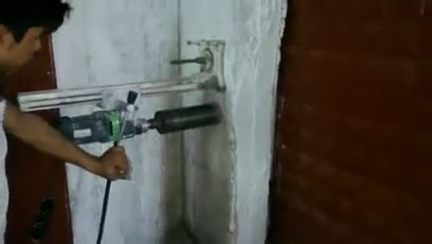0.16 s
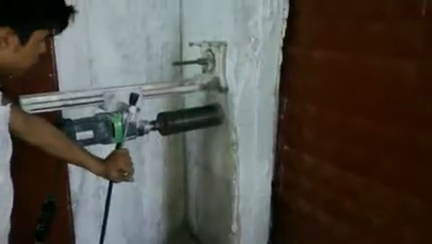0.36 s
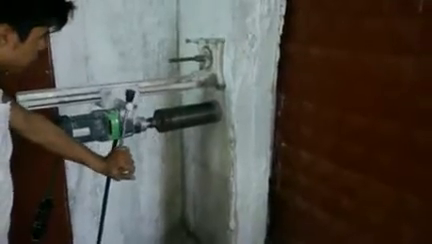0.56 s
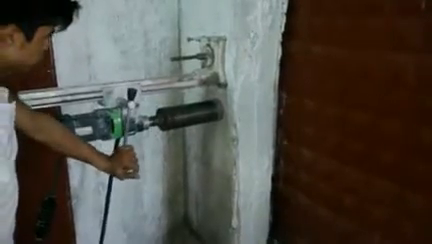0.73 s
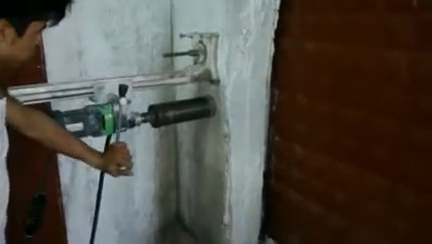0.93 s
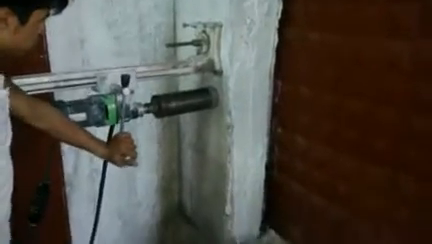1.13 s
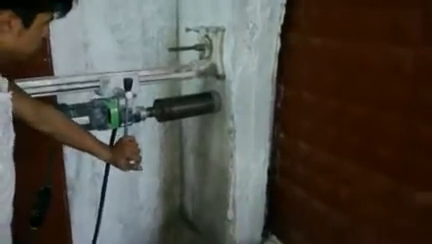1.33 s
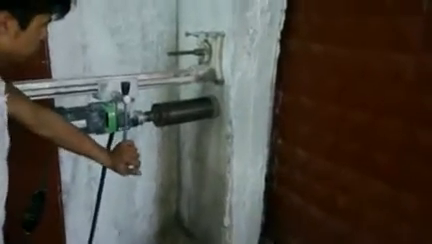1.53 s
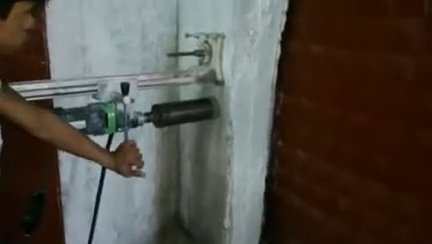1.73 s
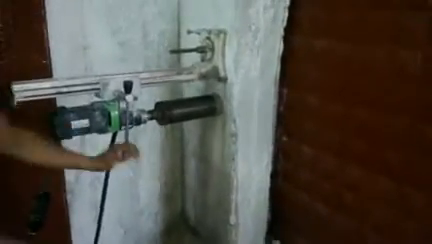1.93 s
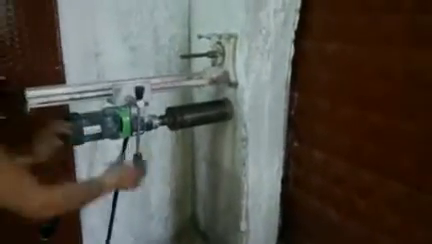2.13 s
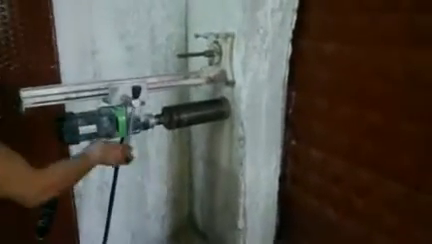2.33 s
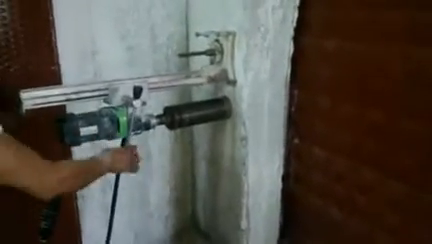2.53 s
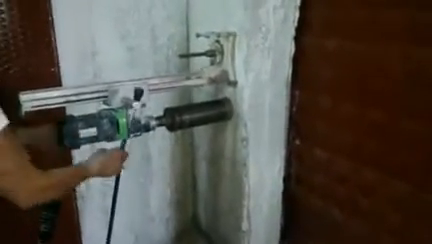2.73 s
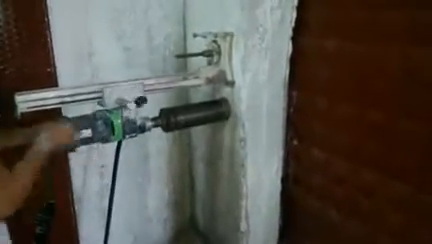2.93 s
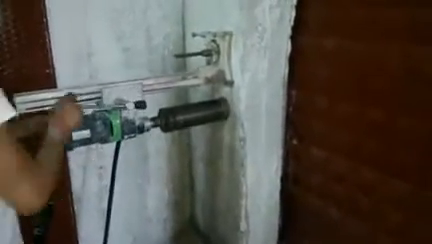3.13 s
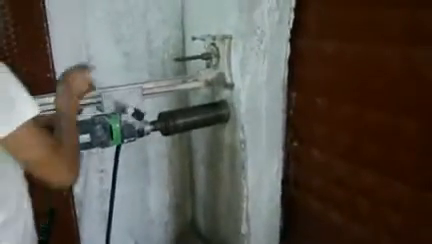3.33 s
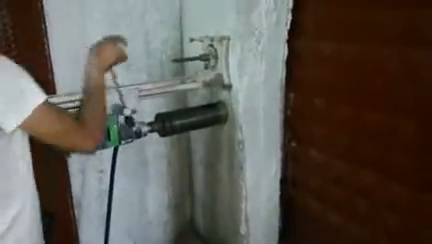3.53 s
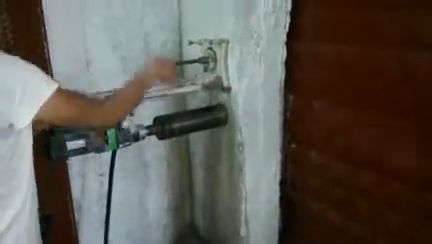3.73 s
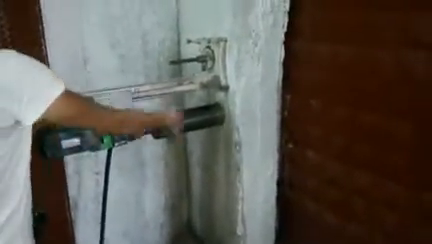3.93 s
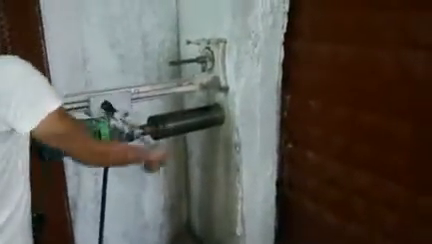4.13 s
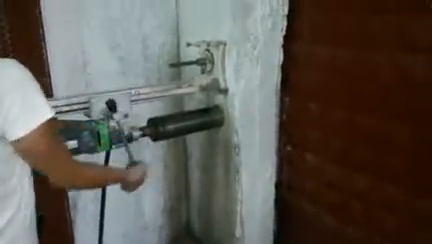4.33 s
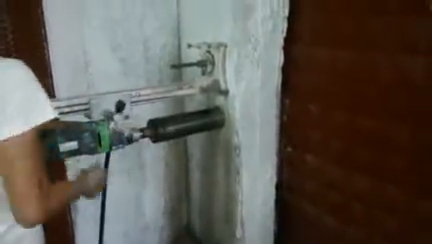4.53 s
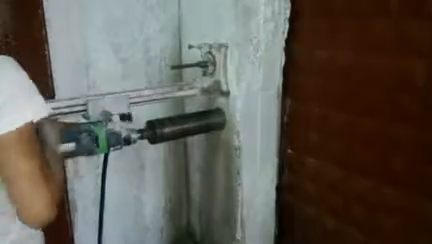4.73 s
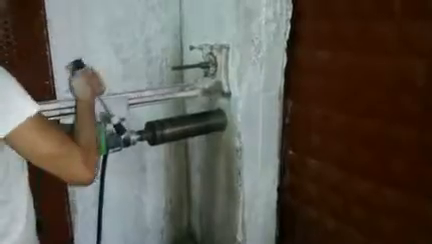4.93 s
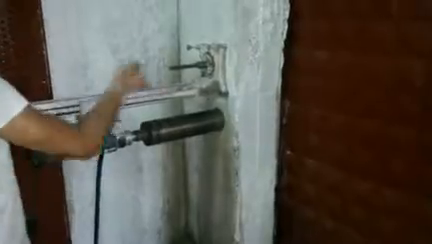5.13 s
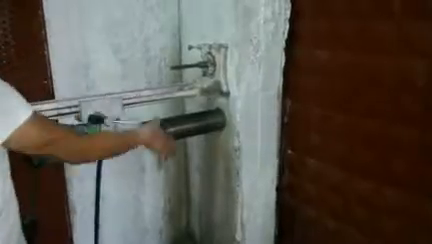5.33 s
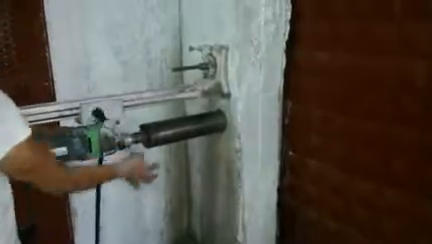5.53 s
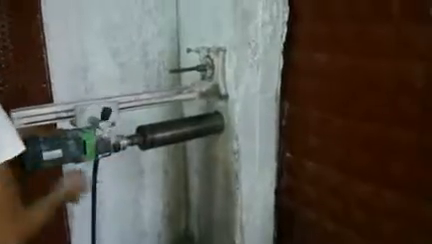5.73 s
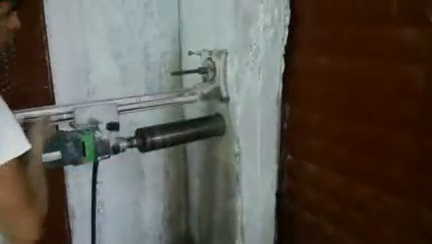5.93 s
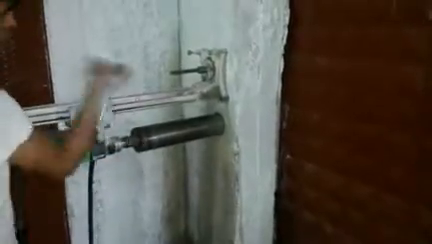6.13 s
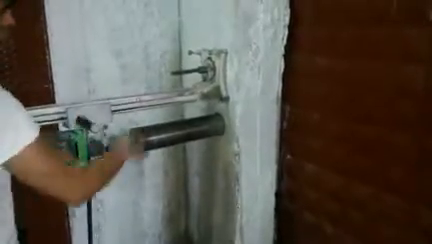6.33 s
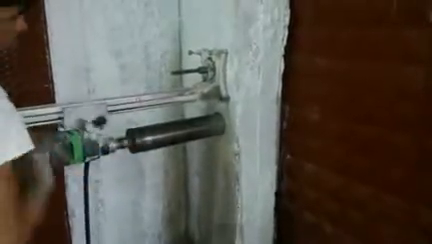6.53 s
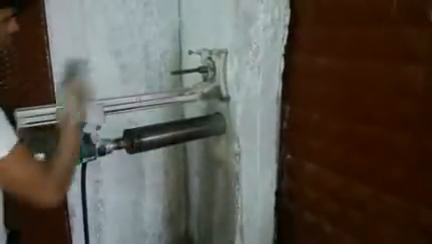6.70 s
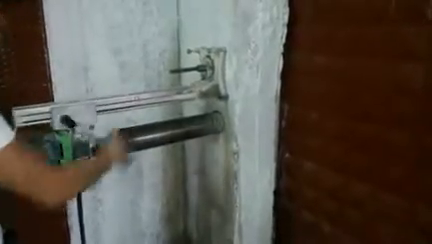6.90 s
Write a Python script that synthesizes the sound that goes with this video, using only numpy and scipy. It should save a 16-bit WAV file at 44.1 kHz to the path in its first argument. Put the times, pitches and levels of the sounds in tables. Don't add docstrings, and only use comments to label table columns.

```python
import sys
import numpy as np
from scipy import signal
from scipy.io import wavfile
from scipy.ndimage import uniform_filter1d, map_coordinates

SR = 44100
rng = np.random.default_rng(int(sys.argv[2]) if len(sys.argv) > 2 else 0)


def put_to_file(sound):
    columns = np.atleast_2d(sound).T
    safe = np.clip(columns, -1, 1)
    whole_steps = np.round(safe * 32767)
    wavfile.write(sys.argv[1], SR, whole_steps.astype(np.int16))


def boost(x):
    u = np.asarray(x, float) / 20
    return 10 ** u


N = 311341
HOP = 128
LAG_S = 5 / SR
MOTOR_DB = -27
FREE_FROM_S, FREE_TO_S = 6.0, 6.73

# (time [s], motor [dB], rim on concrete [dB], share of thin spray [dB], phone turned L-R [dB])
DRILL_RUN = [(.2, -27, -17.5, -11.5, -1), (.45, -25.5, -16, -12, -0.5), (.9, -26.5, -18.5, -9.5, 1),
             (1.6, -26.5, -19, -8.5, -3), (2.2, -28, -17.5, -12, -1), (2.8, -26.5, -17.5, -13, -4.5),
             (3.4, -24, -15.5, -13.5, -5), (3.6, -24.5, -16.5, -12, -6.5), (4.2, -23.5, -16, -12, -5.5),
             (4.44, -24.5, -16.5, -13.5, -7.5), (4.52, -26, -18, -12, -6.5), (5.3, -28, -17, -14.5, -5.5),
             (5.8, -27.5, -17, -14, -6.5), (6.1, -29.5, -16.5, -14.5, -5.5), (6.6, -33, -16.5, -16, -5.5),
             (6.96, -33.5, -18, -17.5, -6.5)]


def unit(x):
    return x / np.sqrt(np.mean(np.atleast_2d(x).mean(0) ** 2) + 1e-20)


def curves(rows, step=1):
    s, *cols = np.transpose(rows)
    t = np.arange(0, N + 8 * step - 8, step) / SR
    return [np.interp(t, s, c) for c in cols]


def wobble(rate_hz):
    return map_coordinates(rng.standard_normal(N // 30), [np.arange(N) * rate_hz / SR])


def spells(rows, edge_s):
    t = np.arange(N) / SR
    power = 0
    for start_s, end_s, db in rows:
        inside_s = np.minimum(t - start_s, end_s - t)
        power = power + boost(2 * db) * np.clip(inside_s / edge_s + .5, 0, 1)
    return np.sqrt(power)


def blurred(phase, rough, rate_hz):
    blur = np.array([wobble(rate_hz) + 1j * wobble(rate_hz) for _ in range(2)]) / np.sqrt(2)
    phasor = np.sqrt(1 - rough) + np.sqrt(rough) * blur
    return np.sqrt(2) * np.imag(phasor * np.exp(1j * phase))


def rush(spectrum, alike, patchy_db, grit_db=0, shape=None, size=HOP):
    seed = rng.standard_normal((2, N))
    seed *= boost(grit_db * np.clip(wobble(900), -2.5, 2.5))
    hz, _, z = signal.stft(seed, SR, nperseg=4 * size, noverlap=3 * size)
    field = uniform_filter1d(rng.standard_normal(z.shape), size=7, axis=1)
    field = uniform_filter1d(field, size=20 * HOP // size, axis=2)
    turn = np.arccos(np.clip(alike, 0, 1)) / 2
    z = np.cos(turn) * z[0] + np.sin(turn) * np.array([z[1], -z[1]])
    z[0] *= np.exp(-2j * np.pi * hz * LAG_S)[:, None]
    f, *sides = np.transpose(spectrum)
    db = np.array([np.interp(np.log(hz + 1), np.log(f), side, -120, -120) for side in sides])[..., None]
    db = db + patchy_db * field / field.std()
    if shape:
        db = db + shape(hz[:, None], z.shape[2])
    return unit(signal.istft(z * boost(db), SR, nperseg=4 * size, noverlap=3 * size)[1][:, :N])


def judder():
    winding_s, calm_db, winding_db = 3.6, 1, 2
    return np.where(np.arange(N) / SR < winding_s, calm_db, winding_db) * wobble(22)


def snags():
    # (time [s], length [s], change [dB])
    snag_rows = [(1.074, .03, 0), (1.85, 0.1, -3), (2.012, 0.087, -0.5), (3.208, 0.034, 2),
                 (4.24, 0.055, 3.5), (4.46, 0.026, 1), (5.013, 0.024, -5), (5.21, .04, 3.5),
                 (5.457, 0.074, -5.5), (5.538, 0.083, -3.5), (5.64, 0.14, 2), (5.727, .03, 4),
                 (5.882, 0.042, -4), (6.222, .05, 3.5), (6.752, 0.049, 4.5), (6.847, 0.098, -1)]
    t = np.arange(N) / SR
    return sum(db * np.exp(-((t - s) / (0.2 * length_s)) ** 2) for s, length_s, db in snag_rows)


def effort(middle_db, slope, loss_db, shaky):
    free = np.interp(np.arange(N) / SR, (FREE_FROM_S, FREE_TO_S), (0, 1))
    motor_db = curves(DRILL_RUN)[0]
    return middle_db + slope * (motor_db - MOTOR_DB) - loss_db * free + shaky * judder()


def motor():
    # (time [s], rotor [Hz], rotor tone [dB])
    rotor_rows = [(.2, 285, -58), (1.1, 266, -56), (1.2, 259, -55), (1.35, 256.5, -54), (2.0, 270.3, -46),
                  (2.3, 256.5, -47), (2.55, 295, -40), (3.0, 363, -41), (3.2, 378, -43), (3.45, 383.5, -41),
                  (3.8, 387.7, -40), (4.42, 389.5, -40), (4.68, 316, -45), (5.1, 280, -47),
                  (5.38, 323, -43), (5.8, 314, -52), (6.1, 243, -41), (6.3, 217, -46)]
    # (start [s], end [s], level [dB])
    whine_rows = [
        (2.7, 3.25, -40),
        (3.25, 3.42, -34),
        (3.42, 3.86, -30),
        (3.86, 4.45, -43),
    ]
    # (start [s], end [s], level [dB])
    squeal_rows = [
        (.8, 1.04, -38),
        (1.04, 1.14, -32),
        (1.14, 1.32, -25),
        (1.32, 1.56, -28),
        (1.56, 1.64, -35),
        (1.64, 2.28, -29),
    ]
    slots, teeth, rotor_stop_s = 12, 6, 6.36
    hz, rotor_db = curves(rotor_rows)
    shaft = np.cumsum(hz * (1 + .001 * wobble(20))) / SR
    turn = 2 * np.pi * (shaft - [[LAG_S], [0]] * hz)
    rotor = boost(rotor_db + 1.2) * spells([(0, rotor_stop_s, 0)], edge_s=.1)
    rotor = rotor * blurred(turn, rough=.3, rate_hz=30)
    whine = spells(whine_rows, edge_s=.1) * boost([[-4], [5]])
    whine = whine * blurred(slots * turn, rough=.08, rate_hz=30)
    chatter = 2 * np.pi * np.cumsum(12 * wobble(18)) / SR
    squeal = spells(squeal_rows, edge_s=.05) * boost(1.3 + 1.3 * wobble(25))
    squeal = squeal * blurred(teeth * turn + chatter, rough=.22, rate_hz=90)
    return rotor + whine + squeal


def housing_roar(cut):
    # (frequency [Hz], left [dB], right [dB])
    housing_spectrum = [(377, -59, -16), (570, -5, -6.5), (630, -7.5, 3), (692, 0, -1), (847, -3.5, 6),
                        (860, -4.5, 0), (1012, 1.5, 1.5), (1080, -11.5, 1), (1130, -2, -0.5),
                        (1176, -3.5, -3.5), (1360, -9, -2), (1811, -5, -4.5)]
    level_db = effort(-29.5, 0.59, 2.3, shaky=0.61) + 0.7 * cut
    return boost(level_db) * rush(housing_spectrum, alike=0.77, patchy_db=1.35, size=4 * HOP)


def freed(hz, frames):
    free = np.interp(np.arange(frames) * 2 * HOP / SR, (FREE_FROM_S, FREE_TO_S), (0, 1))
    return 5.5 * free * np.log2((hz + 1) / 2500)


def fan_and_gears(cut):
    # (frequency [Hz], left [dB], right [dB])
    whir_spectrum = [(896, -17, -15), (1394, -5, -5.5), (1870, -5.5, -7), (2060, -5, -3), (2550, -5, -4.5),
                     (3260, -6.5, -5), (4080, -7.5, -5.5), (4900, -12.5, -4.5), (6060, -33, -31)]
    level_db = curves(DRILL_RUN)[0] + 2.31 + 0.72 * cut + 0.21 * snags() + .4 * judder()
    return boost(level_db) * rush(whir_spectrum, alike=0.18, patchy_db=1.5, grit_db=0.42,
                                shape=freed, size=2 * HOP)


def ports(hz, frames):
    # (time [s], left [Hz], left [dB], right [Hz], right [dB])
    port_rows = [(.2, 7200, 13, 8750, 12), (.8, 7430, 10, 8660, 13), (1.1, 7120, 9, 8440, 12),
                 (2.5, 6660, 10, 8140, 9), (4.3, 6550, 14, 8330, 8.5), (7, 6840, 10.5, 8000, 3.5)]
    # (time [s], frequency [Hz], depth [dB])
    dip_rows = [(.35, 9500, 0), (.6, 10200, 6), (1.1, 11100, 11), (1.6, 12000, 15), (1.9, 12500, 10),
                (2.3, 13300, 0)]
    left_hz, left_db, right_hz, right_db = (c[:frames] for c in curves(port_rows, HOP))
    dip_hz, dip_db = (c[:frames] for c in curves(dip_rows, HOP))

    def bump(centre_hz, width_hz):
        return 1 / (1 + ((hz - centre_hz) / width_hz) ** 2)

    left = left_db * bump(left_hz, 870) - dip_db * bump(dip_hz, 550)
    return np.array([left, right_db * bump(right_hz, 1600)])


def rim(cut):
    # (frequency [Hz], left [dB], right [dB])
    hiss_spectrum = [(4460, -20.5, -25), (5370, -14, -7.5), (5880, -9, -8.5), (8000, -11.5, -4),
                     (9430, -9.5, -8), (9800, -20, -15.5), (11550, -19, -16), (12500, -50, -50)]
    # (frequency [Hz], left [dB], right [dB])
    spray_spectrum = [(8650, -21, -43), (9780, -4, -1), (11100, 0.5, -6.5), (12100, -5.5, 0.5),
                      (12880, -5, -7), (14540, -7.5, -5.5), (14440, -70, -68)]
    _, rim_db, spray_db, lr_db = curves(DRILL_RUN)
    rim_db = rim_db + snags()
    lr_db = lr_db + 0.45 * judder()
    hiss_sides = boost([(lr_db + 2.5) / 2, -(lr_db + 4.0) / 2])
    hiss = boost(rim_db + 0.91 * cut + 0.1 * judder()) * hiss_sides
    hiss = hiss * rush(hiss_spectrum, alike=0.046, patchy_db=1.18, grit_db=1.03, shape=ports)
    spray_sides = boost([0.14 * lr_db - .3, -.15 * lr_db + 0.65])
    spray = boost(rim_db + spray_db + 1.0 * cut + 0.47 * judder()) * spray_sides
    spray = spray * rush(spray_spectrum, alike=0.12, patchy_db=1.1, grit_db=1.0, shape=ports)
    return hiss + spray


def drill():
    cut = 0.24 * wobble(18) + 0.71 * wobble(45)
    return housing_roar(cut) + fan_and_gears(cut) + rim(cut)


def tube():
    # (frequency [Hz], left [dB], right [dB])
    column_spectrum = [(1700, -11, -40), (1880, -5, -5.5), (1960, -0.5, 7), (2080, 1.5, -11.5),
                       (2315, -3.5, -7), (2400, -25, -34)]
    opens_s, shut_db = 2.55, 2.5
    damping_db = shut_db * (np.arange(N) / SR < opens_s)
    level_db = effort(-28.5, 0.69, 1.8, shaky=1.0) - damping_db + 0.43 * wobble(12) - 2.5
    return boost(level_db) * rush(column_spectrum, alike=0.17, patchy_db=1.0, size=2 * HOP)


def barrel():
    # (time [s], length [s], frequency [Hz], level [dB], L-R [dB])
    ring_rows = [(.22, .2, 175, -56, -4), (1.25, .14, 185, -52, -4), (2.35, .1, 165, -52, -4),
                 (.3, .4, 390, -50, 3), (1.7, 1.1, 362, -54, 0), (.5, .7, 305, -49, -4),
                 (6.3, 1.2, 291, -50, -2), (5.2, .06, 5950, -34, -5), (5.24, .14, 5580, -35, -5),
                 (5.66, .14, 5820, -35, -5), (6.13, .14, 5560, -31, -4), (6.28, .1, 5710, -27.5, -2),
                 (6.18, .32, 5620, -32, -5), (6.22, .08, 2150, -34, 0), (6.5, .07, 5560, -28, -3),
                 (6.72, .05, 5560, -26, 0), (6.75, .08, 7500, -31, -4), (6.75, .12, 110, -55, -6),
                 (6.94, .1, 6000, -31, -2), (6.98, .07, 2120, -26, 0), (6.99, .08, 3790, -37, 0),
                 (7.0, .08, 1460, -39, 0)]
    # (time [s], peak [dB])
    tick_rows = [
        (5.2006, -12),
        (5.3191, -5),
        (5.477, -16),
        (5.9594, -3),
        (6.2187, -13),
        (6.547, -8),
        (6.758, -11),
    ]
    out = np.zeros((2, N + SR))
    t = np.arange(N) / SR
    for s, length_s, hz, db, lr_db in ring_rows:
        swell = boost(4) * np.exp(-((t - s) / (.6 * length_s)) ** 2)
        rough_tone = blurred(2 * np.pi * hz * t, rough=.55, rate_hz=.035 * hz)
        out[:, :N] += boost([[db + lr_db / 2], [db - lr_db / 2]]) * swell * rough_tone
    u = np.arange(SR // 20) / SR
    bright = signal.butter(3, [5000, 11000], "band", fs=SR)
    for s, db in tick_rows:
        burst = signal.lfilter(*bright, rng.standard_normal((2, len(u)))) * boost(-60 * u / 0.039)
        start = round(s * SR)
        out[:, start:start + len(u)] += boost([[db - 3], [db + 2]]) * burst
    return out[:, :N]


def stand():
    # (start [s], end [s], level [dB])
    shake_rows = [(.2, .85, -64.5), (1.66, 1.72, -55), (2.31, 2.37, -61), (2.56, 2.64, -56),
                  (2.72, 2.77, -56), (2.95, 4.5, -56), (4.6, 4.85, -55.5), (4.97, 5.14, -55.5),
                  (5.19, 5.25, -58), (5.31, 5.6, -54.5), (5.7, 6.6, -58.5), (6.65, 7.1, -51)]
    # (frequency [Hz], left [dB], right [dB])
    rumble_spectrum = [(20, -3, -5), (60, -7.5, -8), (154, -3.5, -0.5), (240, -27, -17)]
    # (frequency [Hz], left [dB], right [dB])
    drone_spectrum = [(130, -29, -41), (202, -12.5, -7), (255, -2.5, -1), (320, -3.5, 4), (393, -5.5, -2.5),
                      (463, -4, 1), (496, 1.5, 2.5), (694, -32, -27)]
    still_db = -80
    shaking = spells(shake_rows, edge_s=0.033) + boost(still_db)
    shake = shaking * boost(3 * wobble(11)) * rush(rumble_spectrum, alike=0.65, patchy_db=1.5, size=4 * HOP)
    drone_db = effort(-38.5, 0.1, 1.8, shaky=0.22) - 2.0 + 1.1 * wobble(8)
    drone = boost(drone_db) * rush(drone_spectrum, alike=0.76, patchy_db=3.5, size=4 * HOP)
    return shake + drone


def scene():
    return motor() + drill() + tube() + barrel() + stand()


def drop_weak_bands(x):
    # (frequency [Hz], level [dB])
    threshold_rows = [(100, -66), (200, -54), (330, -55), (480, -51), (600, -57), (2500, -55),
                      (3500, -50.5), (5300, -50.5), (6500, -60), (10000, -57), (12000, -54.5),
                      (13000, -51.5), (14500, -52.5)]
    hz, _, z = signal.stft(x, SR, nperseg=8 * HOP, noverlap=4 * HOP)

    def smear(v):
        return uniform_filter1d(uniform_filter1d(v, size=3, axis=1), size=5, axis=2)

    f, db = np.transpose(threshold_rows)
    limit_db = np.interp(hz, f, db)[:, None] + 8 * smear(rng.standard_normal(z[:1].shape))
    motor_db = curves(DRILL_RUN, 4 * HOP)[0][:z.shape[2]]
    slope = .7 * np.where(hz < 6000, 1, .5)[:, None]
    limit_db = limit_db + slope * (motor_db - MOTOR_DB)
    kept = smear(np.abs(z) ** 2) > boost(2 * limit_db)
    return signal.istft(z * kept, SR, nperseg=8 * HOP, noverlap=4 * HOP)[1][:, :N]


def top_cut(x):
    return signal.sosfilt(signal.butter(12, 14430, fs=SR, output="sos"), x)


def record(dry):
    # (time [s], gain [0-1])
    fade_rows = [
        (.1, 0),
        (.1002, 0.03),
        (.19, 0.94),
        (.23, 0.94),
        (6.96, 1),
        (7.06, 0.52),
    ]
    held = dry / (1 + np.abs(dry / 1.05) ** 5) ** (1 / 5)
    mix = drop_weak_bands(held) * curves(fade_rows)[0]
    return top_cut(mix)


dry = scene()
out = record(dry)
put_to_file(out)
```